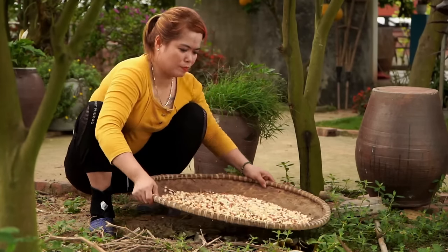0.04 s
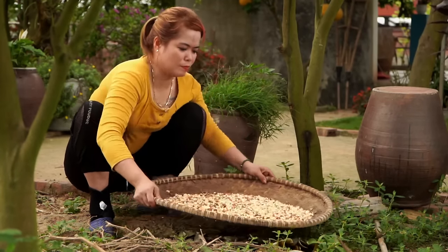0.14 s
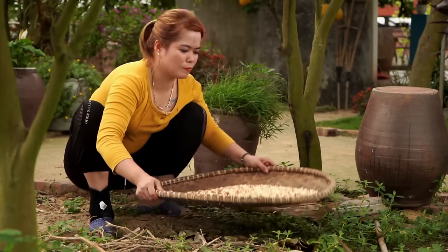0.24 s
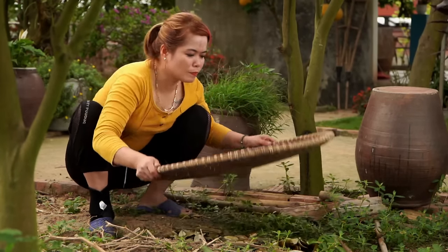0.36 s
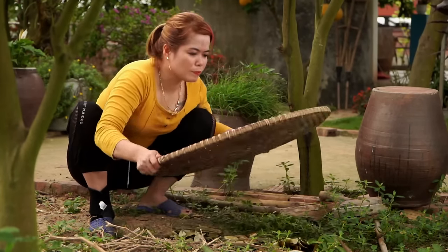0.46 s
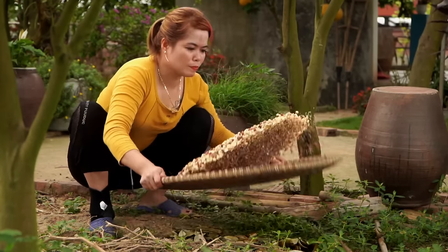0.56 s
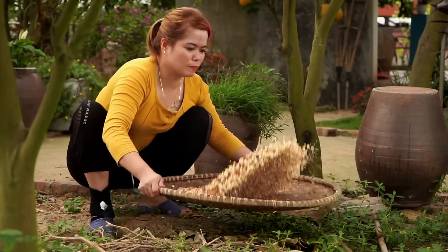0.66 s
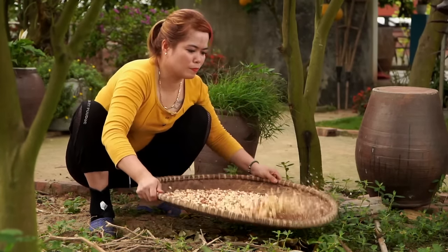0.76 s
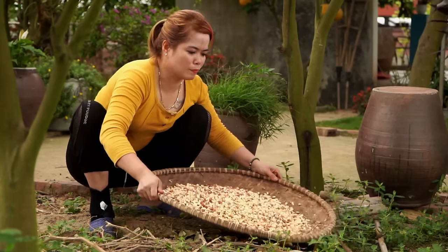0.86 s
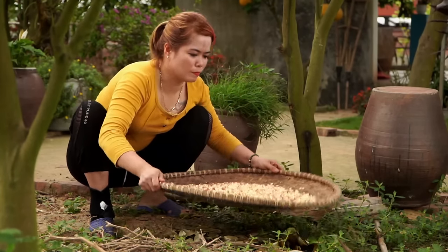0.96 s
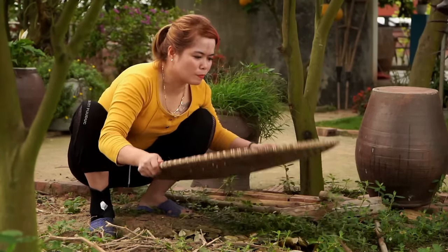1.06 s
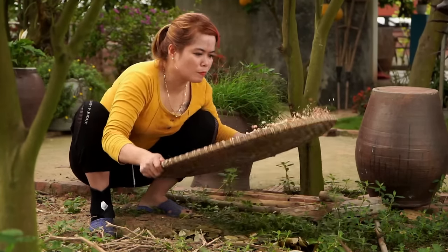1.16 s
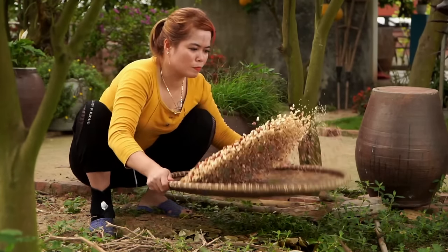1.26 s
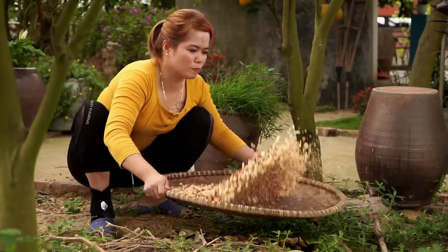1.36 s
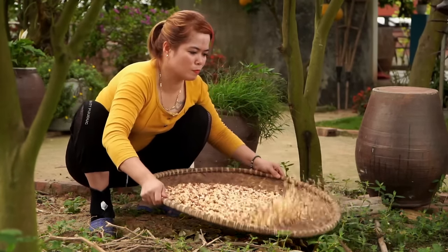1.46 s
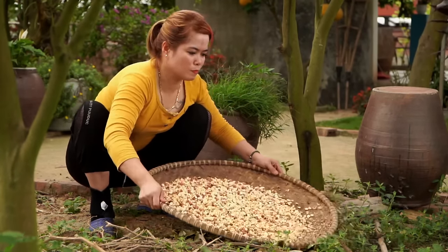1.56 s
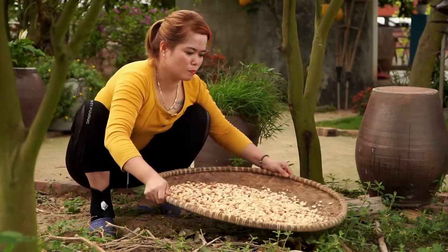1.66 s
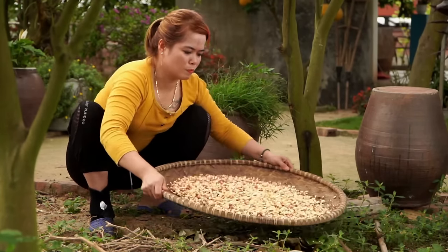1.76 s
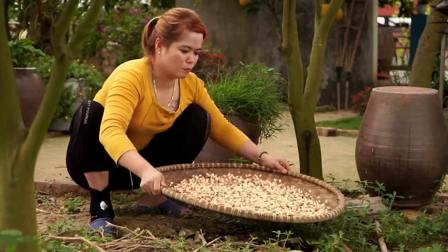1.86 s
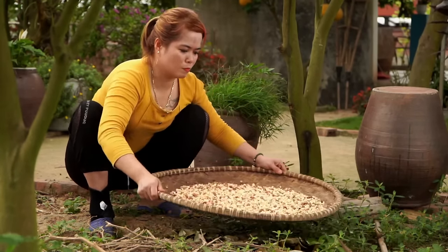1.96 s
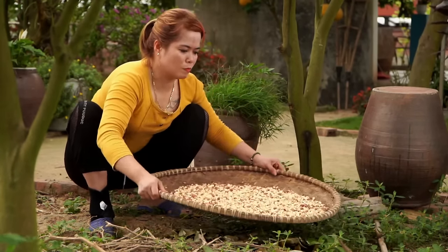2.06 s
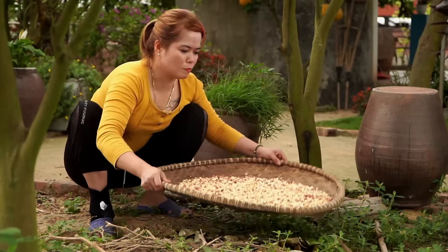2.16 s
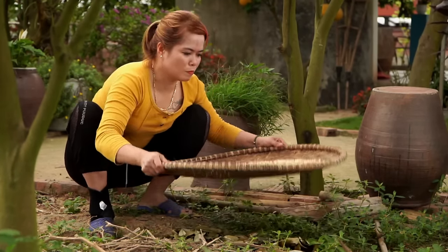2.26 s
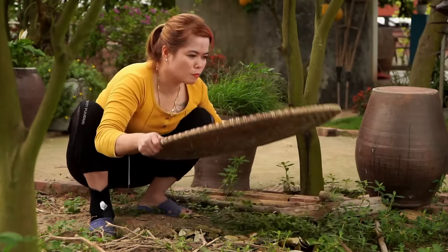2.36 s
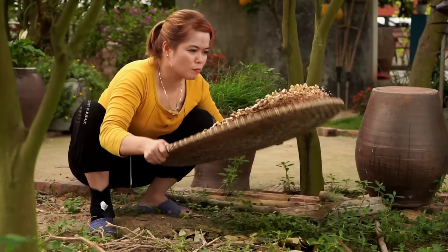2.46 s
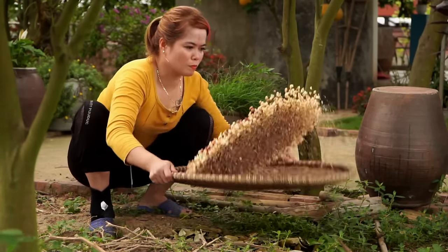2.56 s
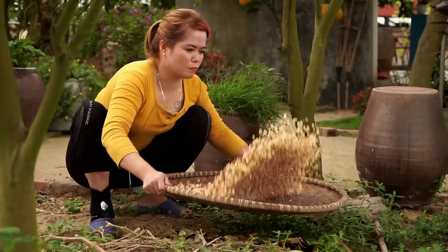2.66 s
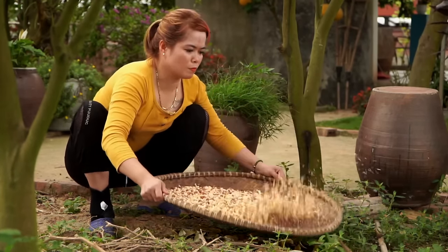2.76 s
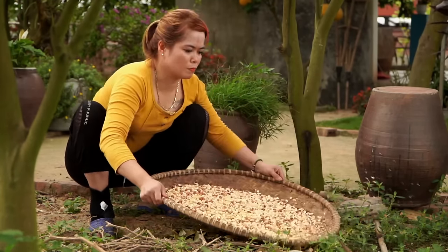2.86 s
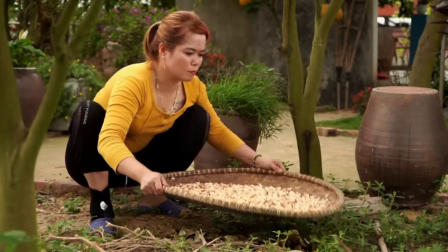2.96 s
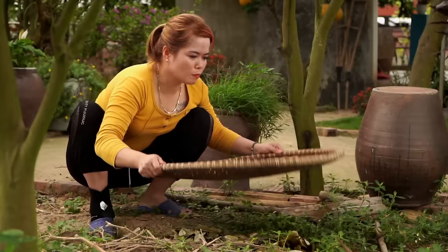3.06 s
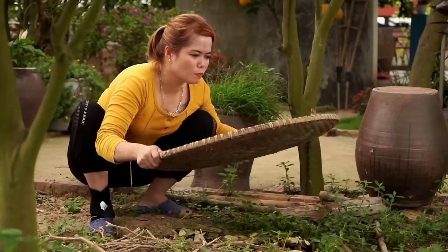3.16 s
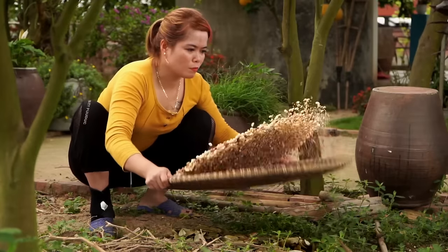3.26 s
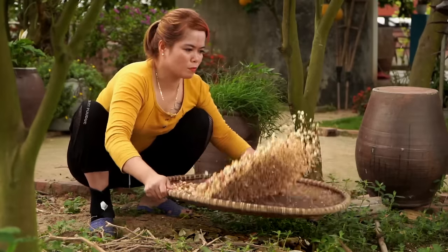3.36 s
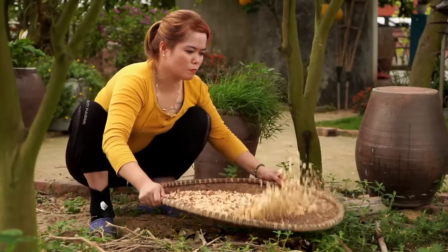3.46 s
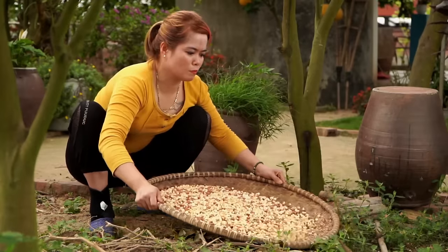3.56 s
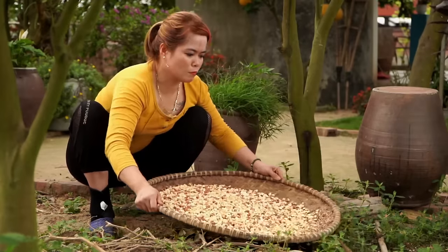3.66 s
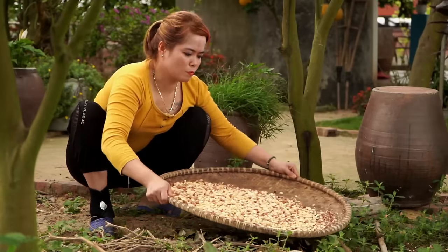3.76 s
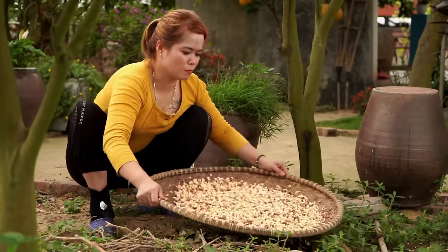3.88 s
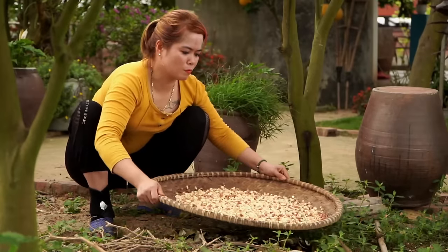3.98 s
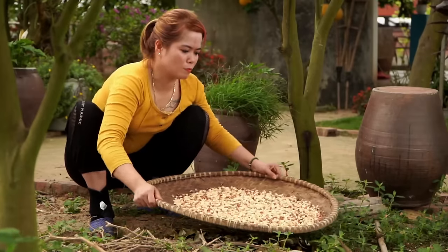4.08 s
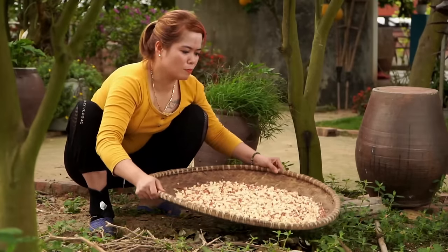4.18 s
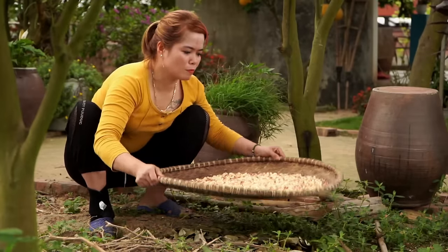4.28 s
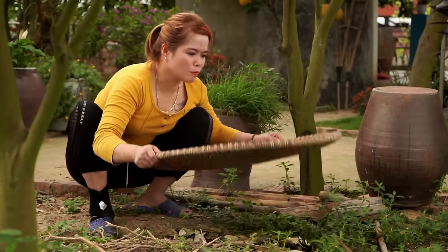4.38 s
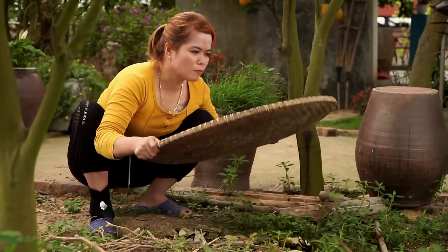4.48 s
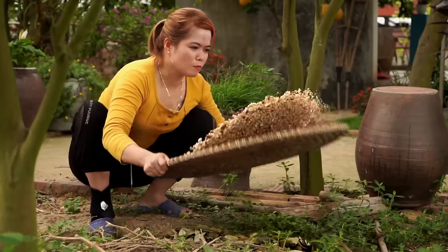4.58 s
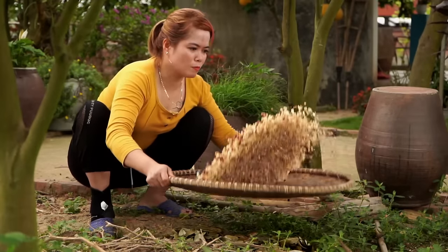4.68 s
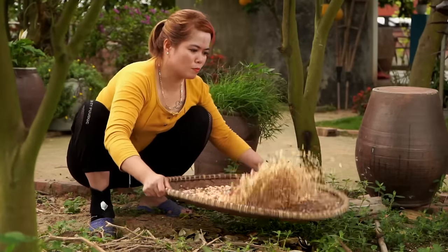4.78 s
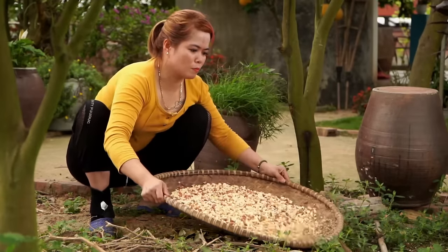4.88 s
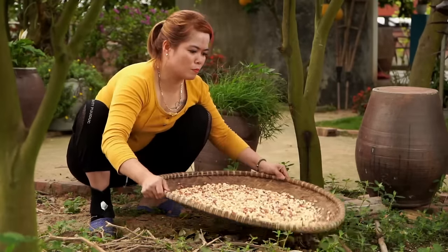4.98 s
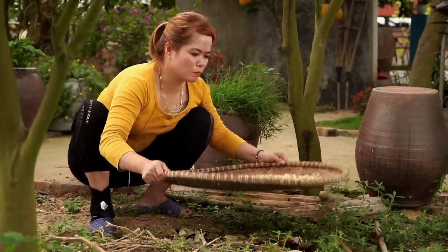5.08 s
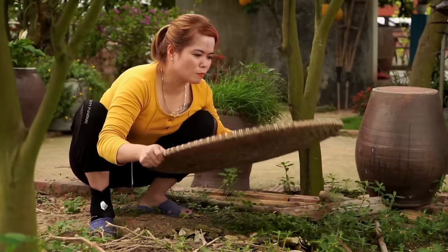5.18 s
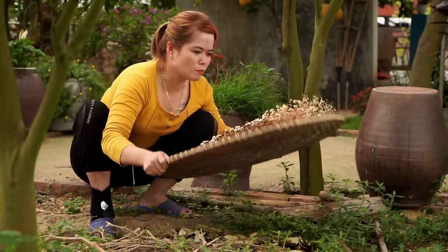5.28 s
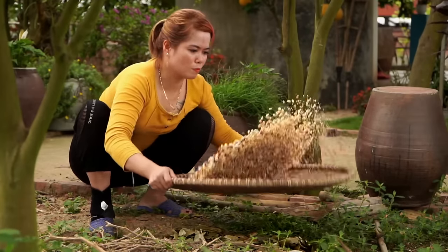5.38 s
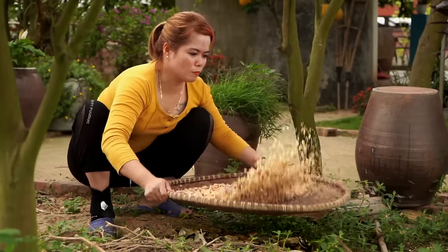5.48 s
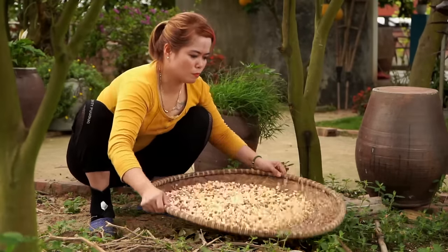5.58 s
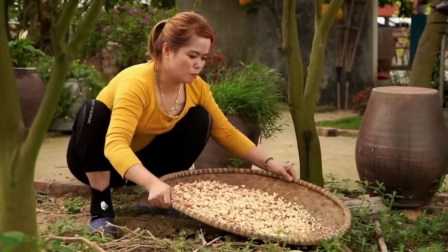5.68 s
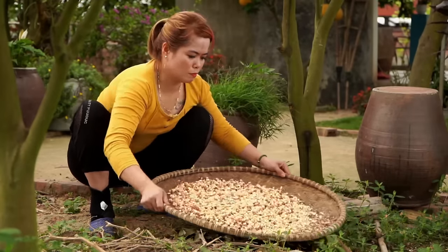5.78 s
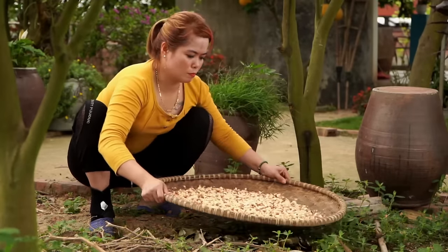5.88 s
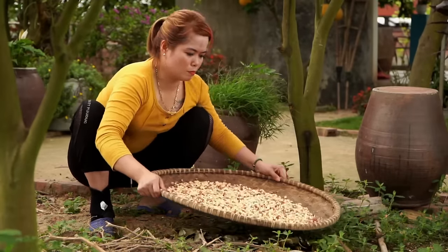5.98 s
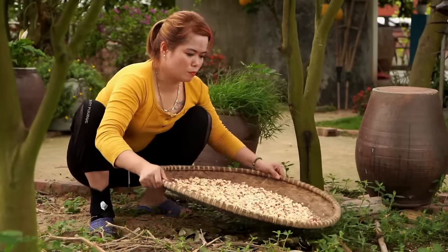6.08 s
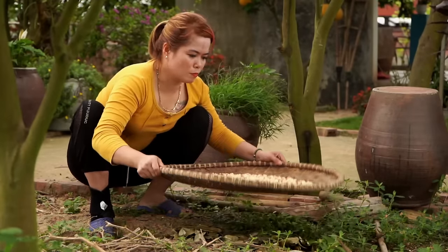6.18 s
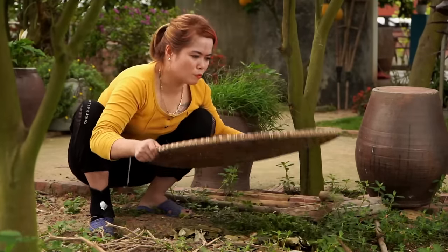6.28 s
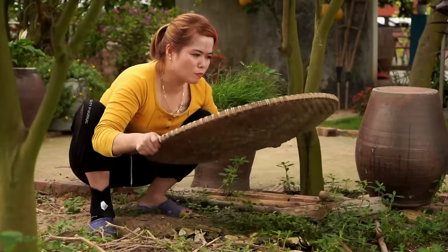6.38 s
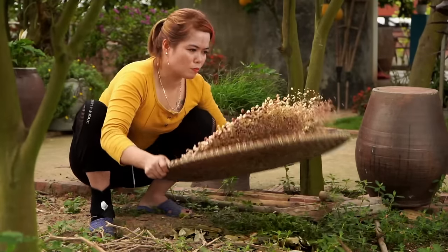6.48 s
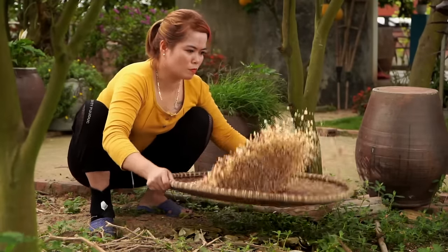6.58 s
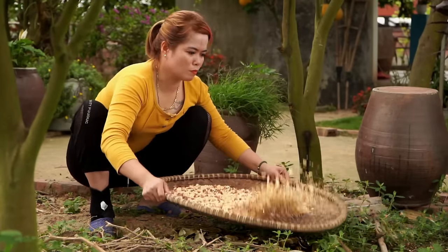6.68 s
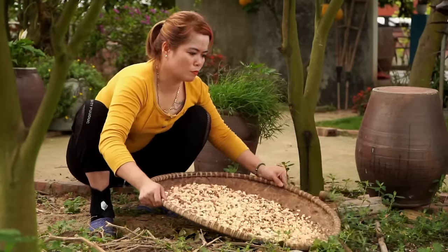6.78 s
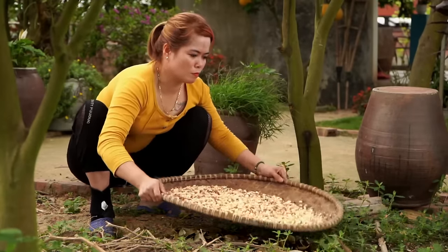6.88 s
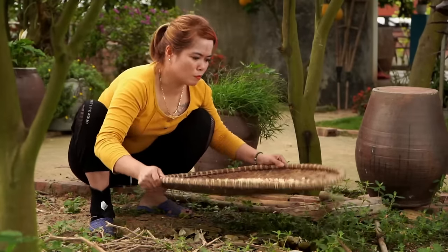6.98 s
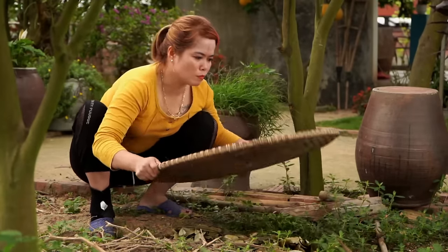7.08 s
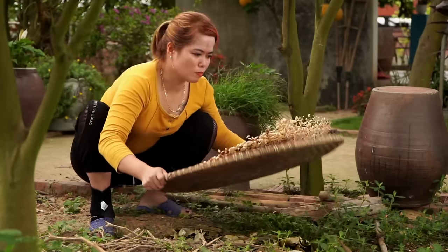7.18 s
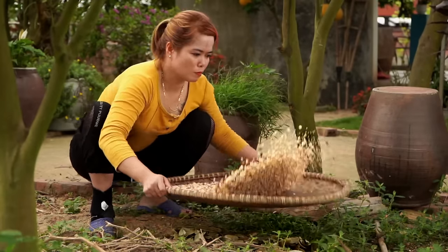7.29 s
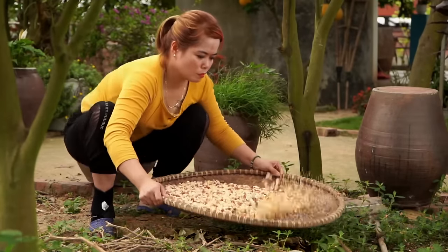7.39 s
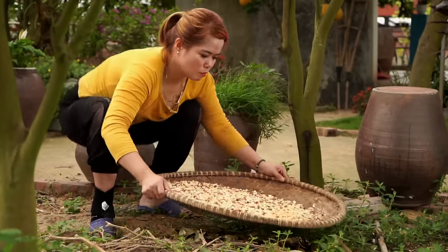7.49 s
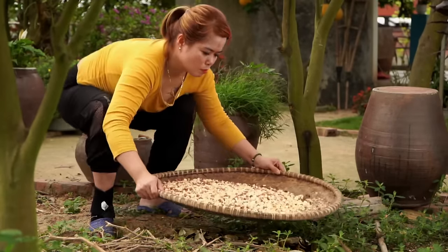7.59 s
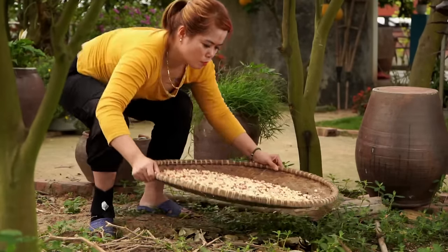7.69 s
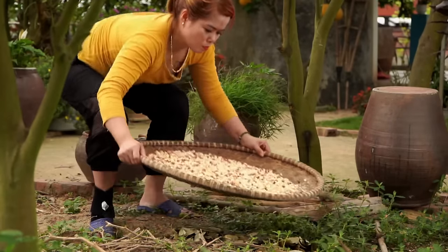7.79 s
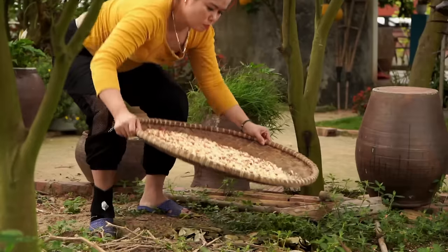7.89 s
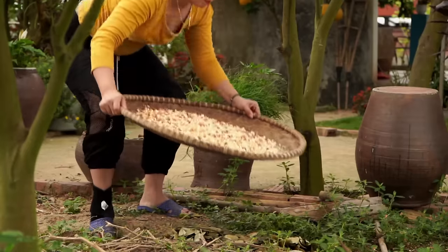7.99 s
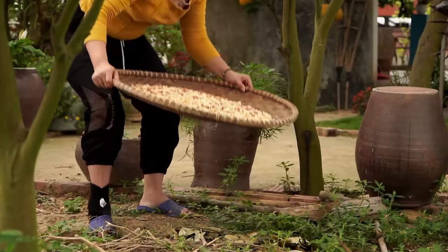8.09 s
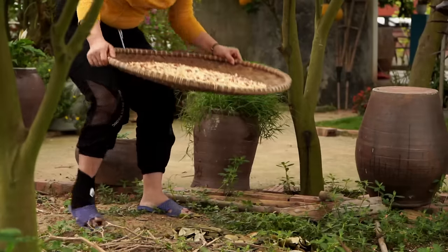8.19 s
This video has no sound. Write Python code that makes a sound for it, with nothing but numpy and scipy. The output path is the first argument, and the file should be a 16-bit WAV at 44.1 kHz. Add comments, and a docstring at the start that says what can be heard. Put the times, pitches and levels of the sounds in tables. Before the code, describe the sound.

Shelled peanuts are tossed on a woven bamboo tray in a garden. Each time they rain back down in a dense, dry, rattling swish about a third of a second long, with a slightly hollow drumming from the tray. Landings come at about 0.6, 1.3, 2.6, 3.3, 4.6, 5.4, 6.5 and 7.2 seconds. Quick shakes send the nuts rolling in softer swishes around 1.7 to 2, 3.7 to 4, 5.7 to 6 and 7.6 to 8.1 seconds. Stray nuts tick sharply on the weave, most clearly near 2.1, 4.1, 6.2 and 8.2 seconds. Throughout, wind buffets the microphone with a prominent, uneven rumble and frequent low thumps. Far away, birds peep and twitter very faintly, a little more in the first second or so and around 6 to 7 seconds, over a soft steady hiss of leaves.

```python
"""In a garden, shelled peanuts are tossed on a woven bamboo tray: they rain back onto the weave,
then roll as it is shaken. Thousands of tiny impacts excite short rings and the drum-like modes of
the tray, merging into a swish; stray nuts tick alone. Turbulent wind buffets the two microphone
ports with rumble and thumps, while birds peep and twitter far off over a faint hiss of leaves."""
import sys
import numpy as np
from scipy import signal
from scipy.fft import rfft, irfft
from scipy.io import wavfile

SR = 44100
rng = np.random.default_rng(int(sys.argv[2]) if len(sys.argv) > 2 else 0)


def digitize_waveform(pressure):
    """Quantize a signal to 16-bit integers and store it at the path in sys.argv[1].

    Rows of a 2-D input are taken as channels; values are limited to [-1, 1].
    """
    field = np.atleast_2d(pressure).T
    bounded = np.clip(field, -1, 1)
    quanta = np.round(bounded * 32767).astype(np.int16)
    wavfile.write(sys.argv[1], SR, quanta)


N = 363384


def nuts():
    """Modal excitation: random impacts, denser when louder, drive short rings and the tray's modes."""
    # colour of the knocks: frequency_hz, density_db
    knock_spectrum = [(240, -4), (400, -10), (488, -5.5), (652, -1.5), (1060, -2.5), (1260, -6),
                      (1660, -1.5), (3720, -1.5), (5530, -6), (15400, -21.5)]
    # drum-like modes, whose strength shifts with the grip: pitch_hz, width_hz, before_db, after_db
    tray_modes = [(498, 88, 1.5, -1.5), (807, 135, -7, -7), (968, 93, -17, 4.5), (1268, 61, 6, -10),
                  (1380, 132, 4.5, 0), (2030, 630, -7.5, -0.5), (2750, 900, -6, -4),
                  (4340, 2000, -14, -17.5)]
    # change of grip on the rim: start_s, end_s
    regrip_span = [5.6, 7.76]
    body_knee_hz, treble_knee_hz = 1700, 2600
    level_db, slope_db, body_db = nut_motion()
    level_db = level_db + drift(25)   # nuts come down in clumps
    chance = np.clip(.8 * from_db(.5 * (level_db + 22.5)), .2, .95)   # of a knock in each sample
    struck = rng.random(N) < chance
    path, side = rng.laplace(0, 1, (2, N))   # each knock has its own spot on the weave
    sizes = from_db(1.56 * np.minimum(rng.exponential(1, N), 5)) * rng.choice([-1, 1], N)
    knocks = sizes * struck * from_db(level_db) / np.sqrt(chance)
    lag_samples = np.round(1.8 * path * np.abs(path) ** .3).astype(int)
    right_arrival = np.clip(np.arange(N) + lag_samples, 0, N - 1)
    left, right = knocks * from_db(-1.4 + 0.5 * side), knocks * from_db(-0.12 - 0.5 * side)
    shape = rng.integers(0, 4, N)   # four nut shapes share out the rings
    pairs = [np.array([left * (shape == k), np.bincount(right_arrival, right * (shape == k), N)])
             for k in range(4)]
    out = np.zeros((2, N))
    for k, hz in enumerate(np.geomspace(380, 15500, 24)):
        treble_db = slope_db * np.clip(np.log2(hz / treble_knee_hz), 0, 1.3)
        bass_db = body_db * max(np.log2(body_knee_hz / hz), 0)
        out += from_db(treble_db + bass_db + 1.95 * drift(3.2)) * resonance(pairs[k % 4], hz, 0.23 * hz)
    regrip = np.interp(np.arange(N) / SR, regrip_span, [0, 1])
    for hz, width_hz, before_db, after_db in tray_modes:   # every knock drums the whole tray
        mode_db = before_db + (after_db - before_db) * regrip
        bass_db = body_db * max(np.log2(body_knee_hz / hz), 0)
        out += from_db(mode_db + bass_db) * resonance(sum(pairs), hz, width_hz)
    return from_db(7) * coloured(out, knock_spectrum)


def nut_motion():
    """Incoherent addition: landings and rolls sum in power, which weights their treble and bass slopes."""
    # the tossed heap rains onto the weave:
    # start_s, length_s, thickest_after_s, first_db, peak_db, last_db, body_db_per_octave
    landings = [(0.592, .26, 0.15, -26.5, -21.5, -25.5, 0), (1.265, 0.3, .165, -23.5, -21.5, -23, 0),
                (2.567, 0.3, 0.12, -21.5, -18.5, -21, -2.7), (3.305, 0.29, 0.22, -18.5, -18, -21, -2),
                (4.623, 0.31, .14, -23.5, -18.5, -23, -3.2), (5.354, 0.27, 0.14, -21.5, -17.5, -22, -3.5),
                (6.501, 0.3, 0.097, -25, -18, -21.5, -2), (7.188, .29, 0.16, -27, -19.5, -21.5, -1.2)]
    # jerks set the nuts rolling: peak_s, rise_db_per_s, peak_db, hold_s, treble_db_per_octave
    shakes = [(0.046, 77, -34.5, 0.027, -2), (1.71, 126, -36, 0.0089, -2), (1.804, 252, -30, 0.017, -2),
              (1.935, 119, -27.5, 0.011, -3), (2.076, 100, -53, 0.021, -14), (3.759, 350, -26, 0.012, -4.5),
              (3.857, 108, -29.5, 0.011, -1.5), (3.987, 154, -28, 0.013, -2), (4.105, 100, -45.5, .04, 4),
              (4.507, 150, -55.5, .02, 5), (5.225, 150, -46, 0.0082, -4), (5.685, 98, -26.5, 0.01, 0.5),
              (5.801, 121, -28.5, .01, -1), (5.899, 175, -28.5, .02, -3), (6.036, 62, -39.5, 0.024, 0),
              (6.19, 60, -53.5, 0.25, 5.5), (7.157, 148, -53, .03, 8), (7.58, 100, -35, 0.035, 2.1),
              (7.687, 93, -44.5, 0.04, 2), (7.803, 136, -35.5, .01, .6), (7.902, 133, -32.5, 0.0071, -1),
              (7.985, 94, -36, 0.012, 1), (8.081, 85, -39, 0.0087, 2.5)]
    attack_s, attack_knee_db, attack_depth_db = 0.033, 6.5, 32.5   # the first nuts arrive
    bounce_s, bounce_loss_db = 0.075, 20.5   # bounces die fast
    settle_db_per_s, roll_down_db_per_s = 102, 149
    first_slope, last_slope, roll_body = 1.3, 3.5, 1.8   # dB per octave
    restless_db = -69.5   # a few nuts always shift
    t = np.arange(0, N / SR + .002, .001)
    power = np.full(len(t), from_db(2 * restless_db))
    tilt, body = power * last_slope, power * roll_body
    for s, length, thickest, first_db, peak_db, last_db, body_db in landings:
        end, settle_db = length + bounce_s, last_db - bounce_loss_db
        times = [0, attack_s / 2, attack_s, thickest, length, end, end + 1]
        levels_db = [first_db - attack_depth_db, first_db - attack_knee_db, first_db, peak_db, last_db,
                     settle_db, settle_db - settle_db_per_s]
        share = from_db(2 * np.interp(t - s, times, levels_db, left=-200))
        slope_db = np.interp(t - s, [0, length], [first_slope, last_slope])   # harder as the heap thins
        power, tilt, body = power + share, tilt + share * slope_db, body + share * body_db
    for s, rise_db_per_s, peak_db, hold, slope_db in shakes:
        onset_db = rise_db_per_s * np.maximum(s - t, 0)
        decay_db = roll_down_db_per_s * np.maximum(t - s - hold, 0)
        share = from_db(2 * (peak_db - onset_db - decay_db))
        power, tilt, body = power + share, tilt + share * slope_db, body + share * roll_body
    return in_time(np.transpose([t, 10 * np.log10(power), tilt / power, body / power]))


def ticks():
    """Impact response: a brief contact excites a ring, its overtone and the tray; a rustle follows."""
    # lone nuts and creaking weave: start_s, peak_db, ring_hz, left_minus_right_db
    contacts = [(0.488, -35, 2010, -6), (1.1408, -38, 2930, 0.0), (1.1707, -37, 3300, -10),
                (2.0968, -20, 2260, -3), (2.139, -26, 5460, -3), (2.333, -29.5, 11000, -12),
                (2.4154, -30.5, 2740, -5), (2.4574, -29, 3300, 0), (3.0175, -44, 2990, 10),
                (3.1665, -30, 2600, -1.0), (4.1111, -22.5, 2480, -5), (4.129, -23, 2550, -3),
                (4.1904, -25.5, 2670, -4), (4.507, -33.5, 3000, -1.0), (5.2415, -30, 3120, -1.5),
                (6.2483, -23.5, 8000, -9), (8.1758, -22, 2290, -2), (8.218, -17, 2030, -1)]
    out, t = np.zeros((2, N + 2000)), np.arange(2000) / SR
    for s, peak_db, hz, pan_db in contacts:
        grit = rng.standard_normal((2, 2000))
        contact = grit[0] * np.exp(-t / 0.00061)
        ring = resonance(resonance(contact, hz, 1.1 * hz), hz, 1.1 * hz)
        body = resonance(contact, hz=1010, width_hz=450)
        overtone = resonance(contact, min(2.7 * hz, 13000), hz)
        rustle = resonance(grit * np.exp(-t / 0.013), hz, hz)
        tick = ring + 1.1 * body + 0.4 * overtone + 0.21 * rustle
        gains = from_db(peak_db + np.array([[pan_db], [-pan_db]]) / 2)
        i = round(s * SR)
        out[:, i:i + 2000] += gains * tick / np.abs(tick).max()
    return out[:, :N]


def wind():
    """Intermittent turbulence: pressure at the ports comes in lumps, most of all from small eddies."""
    # gusts at the ports: time_s, level_db, upper_rumble_relative_db
    gusts = [(0.0, -18.5, -5), (0.2, -28.5, -10), (0.27, -15.5, -5.5), (0.52, -26.5, 6), (0.89, -20, 4),
             (1.17, -25.5, -6.5), (2.15, -20, -0.5), (2.45, -28.5, -8.5), (3.1, -24, 0), (3.2, -29.5, -9.5),
             (3.63, -28, -8), (3.9, -19.5, 0.5), (3.95, -35, -2), (4.29, -16, -4), (4.36, -29.5, -11),
             (5.07, -29, -5), (5.14, -18.5, -6.5), (5.6, -28, -18), (5.71, -16, -6), (5.87, -27.5, -20.5),
             (6.27, -15.5, -2), (7.3, -36.5, -17), (7.77, -19, -13.5), (8.24, -27.5, -10.5)]
    # turbulent pressure spectrum: frequency_hz, density_db
    rumble = [(12, -35), (20, -21), (57, -5.5), (106, -3.5), (205, -9), (468, -24), (654, -40), (709, -53),
              (900, -61), (1170, -92), (1980, -120)]
    lumps_db = 9.3 * np.tanh(1.2 * drift(24.4)) + 2.0 * drift(3.5)
    ports = swept(rng.standard_normal(N)) + 0.29 * rng.standard_normal((2, N))
    level_db, reach_db = in_time(gusts)
    lowpass = signal.butter(2, 150, fs=SR, output="sos")
    large = rms_one(coloured(ports * from_db(0.54 * lumps_db), rumble))
    small = rms_one(coloured(ports * from_db(1.04 * lumps_db), rumble))
    upper = (small - signal.sosfiltfilt(lowpass, small)) * from_db(reach_db)
    return from_db(level_db) * (signal.sosfiltfilt(lowpass, large) + upper)


def thumps():
    """Wave steepening: each eddy is a push and a pull whose steepened front adds overtones."""
    # single eddies that hit the ports: start_s, peak_db, pitch_hz
    eddies = [(0.237, -11, 127), (0.307, -9, 100), (0.933, -9.5, 159), (1.262, -20, 72), (1.517, -10, 121),
              (2.003, -9.5, 126), (2.206, -7, 110.4), (2.456, -15.5, 128), (2.641, -10.5, 128),
              (3.04, -18, 131), (3.085, -14.5, 128), (3.291, -15, 84), (3.716, -14.5, 113),
              (3.827, -13, 137), (4.067, -7.5, 102), (4.234, -9, 121), (4.468, -17, 115),
              (5.172, -11.5, 136), (5.379, -13, 101), (5.714, -8, 122), (6.091, -10.5, 122),
              (6.223, -13.5, 116), (6.968, -18, 110), (7.771, -9.5, 89)]
    out = np.zeros(N + 4000)
    for s, peak_db, hz in eddies:
        cycles = np.arange(4000) / SR * hz - 1.1
        phase = 2 * np.pi * cycles + rng.uniform(0, 2 * np.pi)
        window = np.exp(-(cycles / 0.58) ** 2)
        i = round(s * SR)
        out[i:i + 4000] += from_db(peak_db) * window * np.sin(phase + 0.5 * np.sin(phase))
    return swept(out[:N])


def swept(pressure, lag_s=.00065, turn_rad=.32):
    """Convection: eddies pass the right port first, so the left lags by a delay and a phase turn."""
    turn = turn_rad + 2 * np.pi * lag_s * np.arange(N // 2 + 1) * SR / N
    return np.array([irfft(rfft(pressure) * np.exp(-1j * turn), N), pressure])


def birds():
    """Frequency and amplitude modulation: gliding sine notes waver in level and have one reflection."""
    # bird notes: start_s, length_s, start_hz, end_hz, level_db
    peeps = [(.262, .022, 4450, 5000, -54), (0.367, 0.097, 4100, 4000, -61), (.43, 0.05, 4840, 4880, -58),
             (.472, 0.025, 4450, 5060, -49), (.533, 0.05, 3570, 3640, -58), (0.893, .02, 4500, 4950, -50),
             (0.98, 0.12, 5000, 5000, -58), (1.095, 0.015, 4600, 4930, -44), (1.2, 0.17, 4870, 4950, -61),
             (2.194, 0.17, 3620, 3620, -65), (3.195, 0.046, 3400, 3350, -57),
             (0.322, 0.11, 1017, 1018, -53.5), (6.076, 0.31, 667, 668, -49), (4.23, .03, 2750, 2800, -58),
             (4.6, 0.034, 5400, 5360, -66), (6.42, 0.045, 2530, 2480, -53), (6.473, .03, 2500, 2460, -55),
             (7.02, 0.045, 3300, 3250, -53), (7.127, 0.099, 2770, 2860, -49)]
    out = np.zeros(N)
    for s, length, start_hz, end_hz, level_db in peeps:
        u = np.linspace(0, 1, round(length * SR))
        phase = np.cumsum(start_hz + (end_hz - start_hz) * u) * 2 * np.pi / SR
        i = round(s * SR)
        out[i:i + len(u)] += from_db(level_db) * np.sin(np.pi * u ** 0.65) ** 0.16 * np.sin(phase)
    out *= from_db(2.0 * drift(50))
    reflection = 0.35 * np.roll(out, 500)
    return (out + reflection) * from_db([[1.5], [-1.5]])


def twitter():
    """Superposition: faint, short glides at random moments and pitches add up to a far flock."""
    out, u = np.zeros((2, N + 1500)), np.linspace(0, 1, 1500)
    for when, pitch, glide, size, side in rng.random((160, 5)):
        hz = 2400 * 3.1 ** pitch * (1 + 0.17 * (glide - .5) * u)
        phase = np.cumsum(hz) * 2 * np.pi / SR
        note = from_db(-78 + 7.3 * size) * np.sin(np.pi * u) * np.sin(phase)
        i = int(when * N)
        out[:, i:i + 1500] += note * [[side + .5], [1.5 - side]]
    return out[:, :N]


def garden(level_db=-52):
    """Partial coherence: leaves and distant hiss reach the two ports only partly alike."""
    # background spectrum: frequency_hz, density_db
    hiss_spectrum = [(240, -25), (400, -3), (600, 0), (1300, -10), (2500, -12.5), (5000, -16.5),
                     (9000, -21), (15500, -32)]
    mid, left, right = rng.standard_normal((3, N))
    hiss = rms_one(coloured(.8 * mid + np.array([left, right]), hiss_spectrum))
    return from_db(level_db + 0.5 * drift(8.6)) * hiss


def from_db(db):
    """Decibels to amplitude ratio."""
    return 10 ** (np.asarray(db) / 20)


def rms_one(x):
    """Normalisation to unit rms."""
    return x / np.sqrt(np.mean(x ** 2) + 1e-20)


def in_time(rows):
    """Linear interpolation of (time_s, values...) rows to one value a sample for each column."""
    s, *columns = np.transpose(rows)
    return [np.interp(np.arange(N) / SR, s, c) for c in columns]


def coloured(x, spectrum):
    """Spectral shaping by (frequency_hz, gain_db) points joined on a log-frequency axis."""
    hz, db = np.transpose(spectrum)
    bins_hz = np.arange(N // 2 + 1) * SR / N + 1e-3
    return irfft(rfft(x) * from_db(np.interp(np.log(bins_hz), np.log(hz), db)), N)


def drift(rate_hz):
    """Slow random fluctuation of unit rms: noise through a double one-pole low-pass."""
    r = np.exp(-2 * np.pi * rate_hz / SR)
    return rms_one(signal.lfilter([1], [1, -2 * r, r * r], rng.standard_normal(N + SR))[SR:])


def resonance(x, hz, width_hz):
    """Damped oscillator: a two-pole resonance with unit gain at its peak."""
    r = np.exp(-np.pi * width_hz / SR)
    feedback = [1, -2 * r * np.cos(2 * np.pi * hz / SR), r * r]
    return signal.lfilter([(1 - r * r) / 2, 0, (r * r - 1) / 2], feedback, x + 1e-18)


def scene():
    """Superposition: the pressures of all sources add at the two ports."""
    return nuts() + ticks() + birds() + twitter() + wind() + thumps() + garden()


def record(dry):
    """Band limiting: a steep elliptic low-pass cuts the highest treble."""
    cutoff_hz = 15750
    return signal.sosfilt(signal.ellip(12, .3, 60, cutoff_hz, fs=SR, output="sos"), dry)


dry = scene()
out = record(dry)
digitize_waveform(out)
```